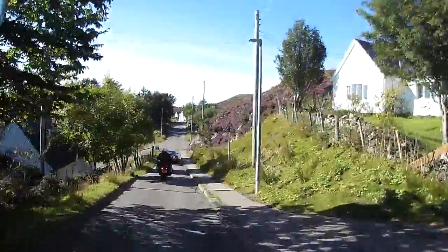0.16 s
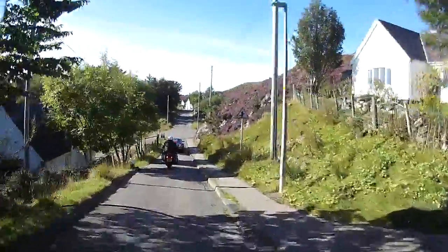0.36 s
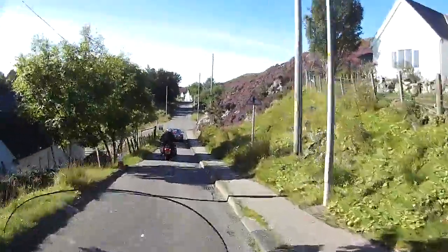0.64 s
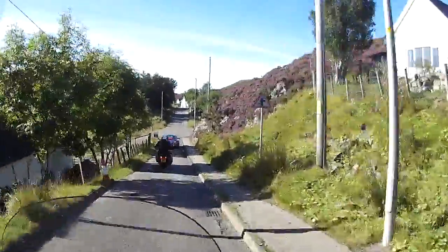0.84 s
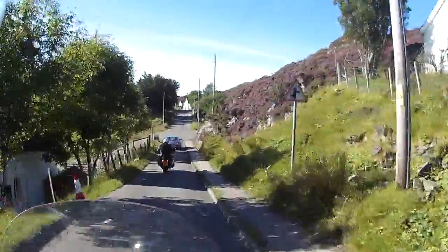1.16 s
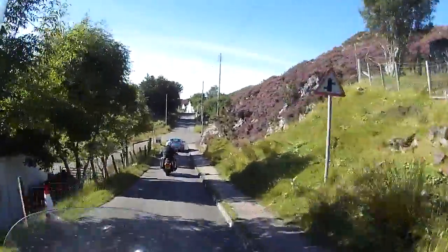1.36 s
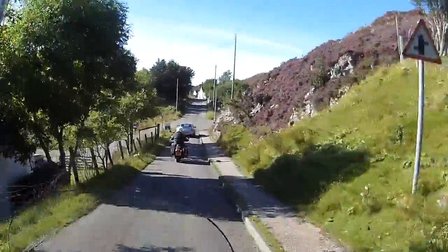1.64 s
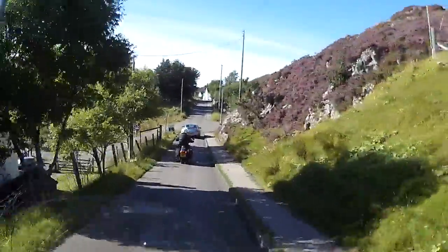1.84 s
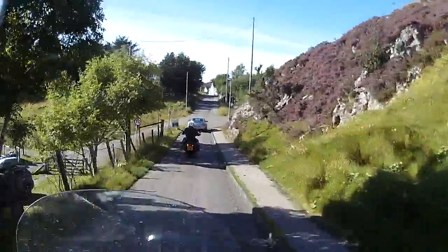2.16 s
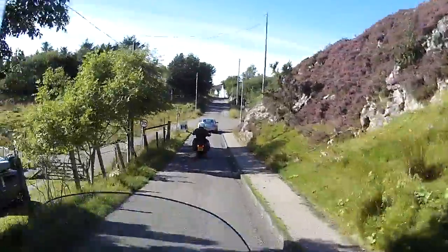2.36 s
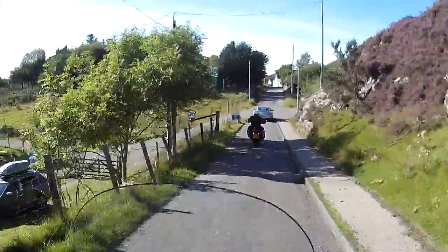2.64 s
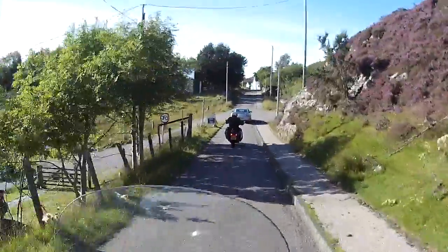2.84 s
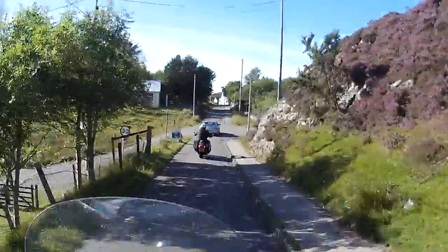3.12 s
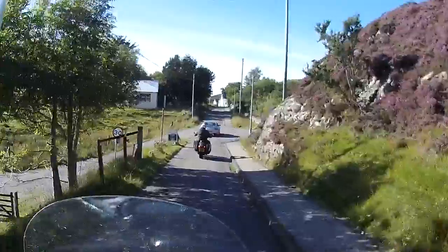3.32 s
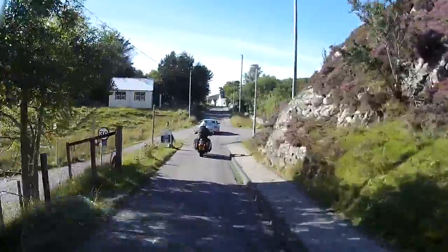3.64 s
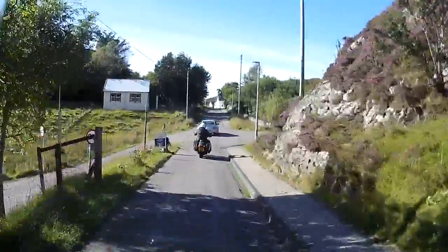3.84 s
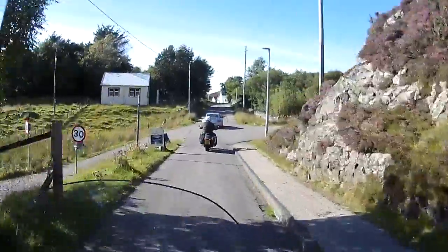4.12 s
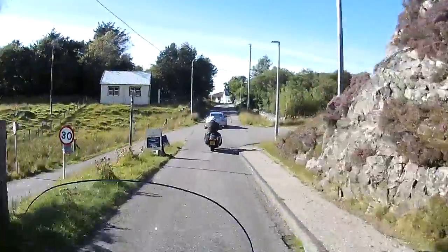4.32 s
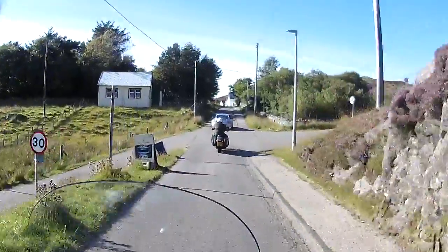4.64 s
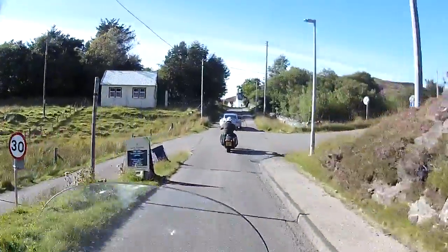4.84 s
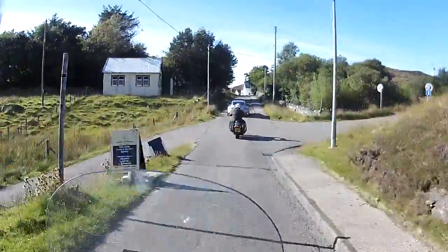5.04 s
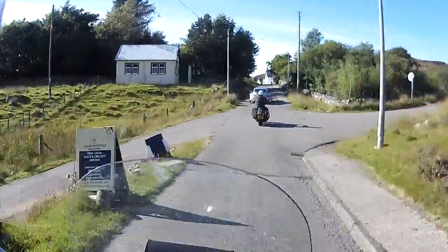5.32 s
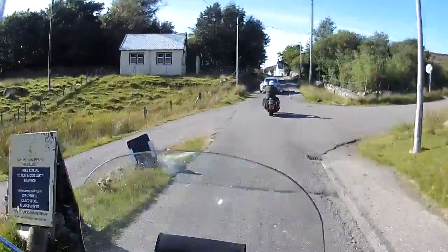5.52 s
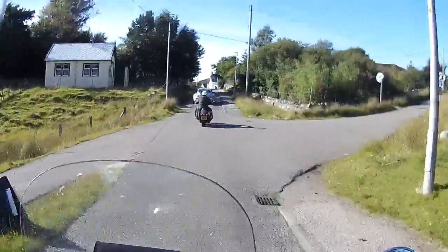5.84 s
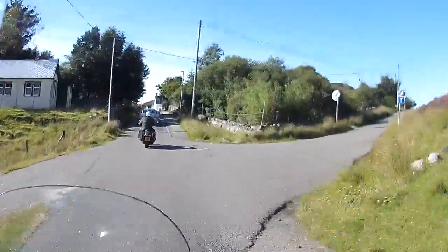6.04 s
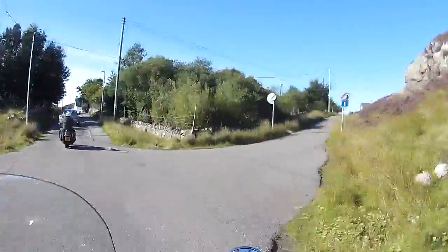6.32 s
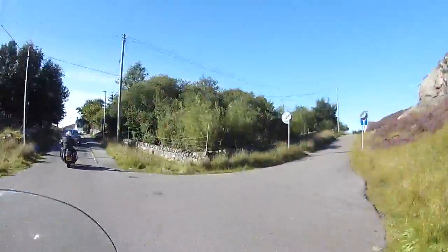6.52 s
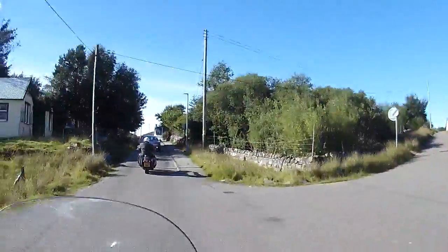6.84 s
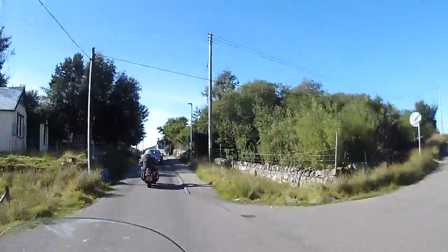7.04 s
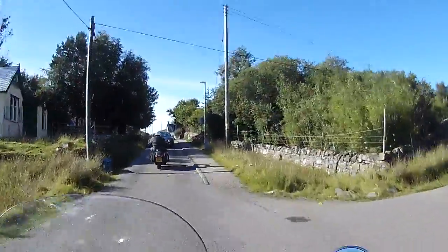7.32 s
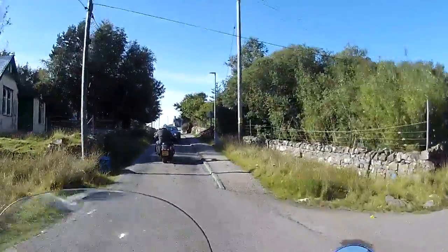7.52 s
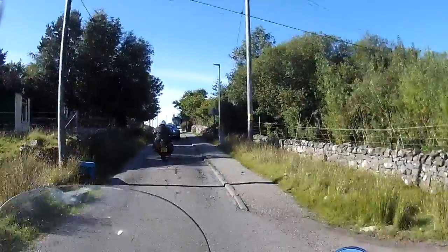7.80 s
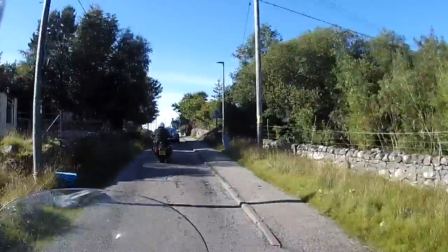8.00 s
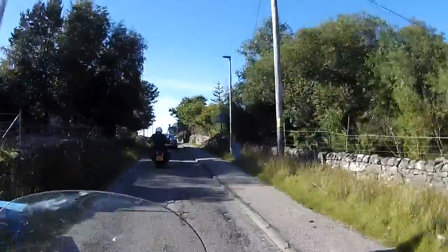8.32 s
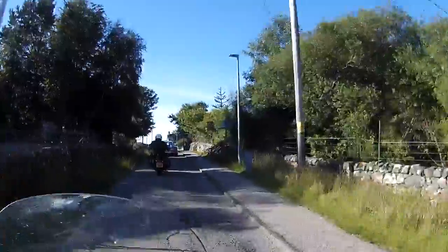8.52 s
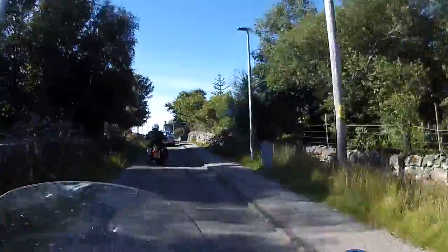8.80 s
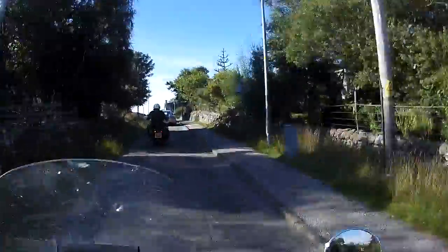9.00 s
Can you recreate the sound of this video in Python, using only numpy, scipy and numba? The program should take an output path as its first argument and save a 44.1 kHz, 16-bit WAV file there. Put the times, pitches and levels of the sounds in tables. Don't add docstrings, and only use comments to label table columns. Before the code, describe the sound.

Wind spits and crackles harshly against a microphone on a moving motorcycle, over low buffeting rumble, breathy whistle, hiss and a faint engine hum.

```python
import sys
import numpy as np
from scipy import signal
from scipy.fft import rfft, irfft
from scipy.io import wavfile
from scipy.ndimage import uniform_filter1d
from numba import njit

SR = 44100
rng = np.random.default_rng(int(sys.argv[2]) if len(sys.argv) > 2 else 0)


def field_ratio(decibels):
    return 10 ** (np.asarray(decibels, dtype=float) / 20)


def master_out(mix):
    frames = np.transpose(np.atleast_2d(mix))
    ceiling = np.clip(frames, -1, 1)
    pcm = np.round(ceiling * 32767).astype(np.int16)
    wavfile.write(sys.argv[1], SR, pcm)


N = 403956


def unit(x):
    return x / np.sqrt(np.mean(x ** 2))


def noise():
    return rng.standard_normal(N)


def curves(table):
    times, *columns = np.transpose(table)
    return [np.interp(np.arange(N) / SR, times, column) for column in columns]


def colour(x, points, size=4096):
    hz, db = np.transpose(points)
    bins = np.fft.rfftfreq(size, 1 / SR) + 1
    gain = field_ratio(np.interp(np.log(bins), np.log(hz), db))
    cepstrum = irfft(np.log(gain))
    cepstrum[1:size // 2] *= 2
    cepstrum[size // 2 + 1:] = 0
    response = irfft(np.exp(rfft(cepstrum)))
    return signal.fftconvolve(x, response / np.sqrt(np.sum(response ** 2)))[:N]


def walk(rate):
    hold = int(SR / rate)
    held = noise()[np.arange(N) // hold]
    return unit(uniform_filter1d(uniform_filter1d(held, hold), hold))


@njit
def resonator(x, hz, width):
    y, band, low = np.empty(len(x)), 0., 0.
    for i in range(len(x)):
        g, damping = np.tan(np.pi * hz[i] / SR), width / hz[i]
        v = (band + g * (x[i] - low)) / (1 + g * (g + damping))
        band, low, y[i] = 2 * v - band, low + 2 * g * v, damping * v
    return y


def narrow_band(hz, width):
    return unit(resonator(resonator(noise(), hz, width), hz, 2 * width))


# (frequency [Hz], density [dB])
HISS_SPECTRUM = [(500, -20), (1200, -13), (2050, -17), (2700, -10), (4000, -5), (4500, -9), (4900, -6),
                 (5300, -17), (8500, -21), (11500, -29), (15500, -26)]


def rush():
    level_db = -36 + 1.2 * walk(3) + 1.2 * walk(60)
    return colour(noise() * field_ratio(level_db), HISS_SPECTRUM)


# (time [s], crank rate [Hz], firing tone level [dB])
ENGINE_COURSE = [(0, 41, -42), (.8, 41, -37), (1.5, 41, -43), (5.5, 40, -43), (5.9, 41.8, -35),
                 (6.15, 40.2, -38), (6.5, 41.4, -31), (7, 42.4, -31.5), (7.5, 43.5, -31), (8, 44.2, -31),
                 (8.6, 44.7, -31), (8.8, 44.7, -37), (9.16, 44.5, -38)]
# (multiple of crank rate [1], level [dB])
FIRING_HARMONICS = [(1, -14), (2, 0), (3, -7.5), (4, -5), (5, -10)]


def engine():
    hz, db = curves(ENGINE_COURSE)
    crank_angle = 2 * np.pi * np.cumsum(hz * (1 + 0.002 * walk(11))) / SR
    tones = np.zeros(N)
    for k, level in FIRING_HARMONICS:
        tones += field_ratio(level + .8 * walk(8)) * np.sin(k * crank_angle + k * k)
    return np.sqrt(2) * field_ratio(db) * tones


# (time [s], pitch [Hz], level [dB])
EDGE_TONE = [(0, 1490, -40.5), (.11, 1480, -37), (.17, 1495, -26.5), (.34, 1490, -28.5), (.44, 1605, -25.5),
             (.8, 1545, -28.5), (1.08, 1635, -26.5), (1.42, 1570, -27.5), (1.62, 1645, -26.5),
             (1.95, 1565, -26.5), (2.3, 1590, -29.5), (2.42, 1625, -36.5), (4.3, 1505, -35),
             (5.05, 1505, -34), (6, 1580, -36), (7.6, 1625, -33.5), (8.7, 1605, -34.5), (9.16, 1605, -30.5)]


def whistle():
    hz, db = curves(EDGE_TONE)
    hz = hz * (1 + .008 * walk(25))
    pure = narrow_band(hz, 50.)
    breathy = narrow_band(hz, 190.)
    tone = pure * field_ratio(1.2 * (db + 25.5)) + .9 * breathy
    return tone * field_ratio(db + 0.8 + 1.5 * walk(25))


# (frequency [Hz], density [dB])
BUFFET_SPECTRUM = [(12, -21), (22, -4), (45, -5.5), (90, -4.5), (140, -8.5), (300, -12.5), (374, -15),
                   (520, -16), (706, -21.5), (1200, -21), (1700, -36.5)]


def buffet(rumble_db):
    rumble = colour(noise() * field_ratio(1.2 * walk(25) + 1.6 * walk(7)), BUFFET_SPECTRUM)
    return rumble * field_ratio(rumble_db + 1.5)


def cavity_hum(rumble_db):
    hz = 224 * (1 + .02 * walk(4))
    return narrow_band(hz, 48.) * field_ratio(rumble_db - 0.5 + 2.0 * walk(12))


def envelope(eddies, edge_ms=.9, tail_ms=.9, sag_db=1.2):
    power = np.zeros(N)
    for start, db, length in eddies:
        ms = np.arange(int((length + 6 * tail_ms) * SR / 1000)) * 1000 / SR
        rise = np.clip(ms / edge_ms, 0, 1)
        body = field_ratio(db - sag_db * (np.minimum(ms / length, 1) + 1.0))
        tail = np.exp(-np.maximum(ms - length + edge_ms, 0) / tail_ms)
        first = int(start * SR)
        power[first:first + len(ms)] += (rise * body * tail)[:N - first] ** 2
    return np.sqrt(power)


# (time [s], level [dB], length [ms])
STRONG_PUFFS = [(0.416, -3, 8.5), (0.461, -3, 13), (0.796, -6.5, 13), (0.98, -3, 10.4), (1.03, 0.5, 5.3),
                (1.127, 0, 6.3), (1.323, -2, 8.4), (1.514, -6, 17.5), (2.095, -1, 5.1), (2.471, -6, 11),
                (2.674, 0, 6.2), (2.763, 3.5, 8), (2.806, 1, 31), (2.916, 2.5, 15), (2.971, 4, 6.5),
                (3.069, -1, 8.8), (3.575, -10.5, 16), (3.776, -1, 8.6), (4.28, -0.5, 10.6),
                (4.734, -2.5, 12), (4.985, -2, 15), (6.381, -9, 8.4), (6.581, -6, 6), (7.424, -6, 26),
                (7.53, -5.5, 4.2), (7.584, -11.5, 27), (7.643, 2.5, 5), (7.676, -2.5, 8.2),
                (8.007, -8.5, 14), (8.973, -9.5, 10.6)]
# (time [s], level [dB])
BRIEF_SPITS = [(0.123, -13), (0.154, -8.5), (0.228, 0), (0.52, -6), (0.766, 5), (1.057, 0), (1.208, 5.5),
               (1.296, 6), (1.951, 0), (2.172, -6), (2.517, 0), (4.079, -3), (4.482, 0), (4.546, -4.5),
               (4.63, -5), (4.677, -0.5), (4.768, -2.5), (4.822, -4), (4.855, -7), (6.05, 2.5), (6.117, -1),
               (6.817, -5.5), (7.015, -10), (8.111, -3.5), (8.783, -1.5), (8.927, -1), (9.025, -4.5),
               (9.055, -12.5), (9.112, -4), (9.142, -2)]
HUSH_MS = 14


def strong_eddies():
    spit_ms = 3.44
    return STRONG_PUFFS + [(s, db, spit_ms) for s, db in BRIEF_SPITS]


def flutter_db(since_s, period_ms):
    return -14 * (since_s * 1000 / period_ms % 1)


# (start [s], length [s], strength [dB], flutter period [ms])
EDDY_FLURRIES = [(0, 0.08, -13, 29), (.288, 0.23, -9, 52), (0.586, 0.084, -9, 300), (0.682, .17, -11, 39.5),
                 (0.919, 0.16, -14, 30), (1.075, 0.46, -10.5, 45.4), (1.59, 0.151, -9.5, 560),
                 (1.887, 0.11, -12, 44), (2.021, 0.2, -13, 38), (2.37, 0.13, -12, 90),
                 (2.533, 0.12, -11, 40), (2.716, 0.31, -7.5, 41), (3.207, .4, -11, 44.6),
                 (3.655, .095, -15.5, 160), (3.789, .12, -11, 45), (4.141, 0.088, -10.5, 23.6),
                 (4.342, 0.12, -15.5, 36), (4.996, 0.086, -11, 39), (5.136, .14, -11.5, 43),
                 (5.475, 0.033, -11.5, 17.6), (5.529, .455, -6, 1500), (6.117, 0.24, -22.5, 42),
                 (6.884, .1, -10, 35.4), (7.113, 0.13, -17, 63), (7.818, 0.054, -16.5, 35),
                 (7.887, 0.093, -12.5, 53), (8.213, 0.2, -16, 36.5), (8.412, 0.079, -12, 230),
                 (8.518, 0.14, -16.5, 26.6), (8.793, 0.24, -20.5, 26)]


def shed():
    rows, strong_s = [], np.array([row[0] for row in strong_eddies()])
    for start, length, db, period in EDDY_FLURRIES:
        gap, size, last = rng.standard_normal((60, 3)).T
        gap_s = 11 / 1000 * field_ratio(4 * gap)
        since = np.cumsum(gap_s) - gap_s[0]
        ms = 4.8 * field_ratio(3.5 * last + .9 * (db + 15))
        ahead = strong_s - (start + since)[:, None]
        ahead_ms = np.where(ahead > 0, ahead, 9).min(axis=1) * 1000
        ms = np.minimum.reduce([ms, (length - since) * 1000, ahead_ms - HUSH_MS])
        level = db + 5 + 3 * size + flutter_db(since, period)
        rows += [row for row in zip(start + since, level, ms) if row[2] > 1]
    return rows


def crackle(flow_db):
    t = np.arange(N) / SR
    calm_top_db, stir_db, hush_db = -31, -14, -8
    power = field_ratio(2 * np.minimum(flow_db, calm_top_db))
    for s, length, db, period in EDDY_FLURRIES:
        stirred = envelope([(s, db + stir_db, 1000 * length)], edge_ms=2.6, tail_ms=3.8)
        power = power + (stirred * field_ratio(flutter_db(t - s, period))) ** 2
    stills = [(max(row[0] - HUSH_MS / 1000, 0), 0, HUSH_MS) for row in strong_eddies()]
    hush = envelope(stills, edge_ms=4.)
    return 10 * np.log10(power) + hush_db * np.minimum(hush, 1)


# (frequency [Hz], gain [dB])
PORT_SPECTRUM = [(150, -77), (300, -25), (1040, -13.5), (2000, -6), (3000, -2), (3950, 3.5), (4800, -4.5),
                 (6500, -17.5), (9000, -26.5), (15500, -71)]
# (frequency [Hz], density [dB])
SPRAY_SPECTRUM = [(4000, -22), (6000, 3.5), (8000, 2), (12000, -27), (15500, 9.5)]
# (time [s], level [dB], length [ms])
TREBLE_EDDIES = [
    (3.558, 3, 19.4),
    (3.68, -22, 1.2),
    (8.927, -34, 4),
]


def port(crackle_db):
    strong = envelope(shed() + strong_eddies())
    swarm_db = 6.5 * walk(800) + 4.5 * walk(90)
    pressure = np.hypot(strong, field_ratio(crackle_db + 1.5 + swarm_db))
    spike_db = 3.2 * walk(1000) + 3.5 * rng.exponential(size=N)
    spikes = unit(noise() * field_ratio(spike_db))
    gusty_db = np.minimum(8.0 * walk(49) + 4.9 * walk(700), 12)
    spray = np.hypot(np.tanh(pressure) ** 2.3 * field_ratio(gusty_db - 10.5), envelope(TREBLE_EDDIES))
    ringing = colour(spikes * pressure * field_ratio(0.05), PORT_SPECTRUM)
    return ringing + colour(noise() * spray, SPRAY_SPECTRUM)


# (time [s], buffeting round the housing [dB], flow across the port [dB])
AIRFLOW = [(0, -27.5, -23), (.2, -32, -37.5), (.5, -28, -37), (.89, -29, -34), (1.1, -28.5, -33),
           (1.7, -26, -11), (1.84, -31, -38.5), (2.3, -32.5, -45.5), (2.88, -26.5, -4), (3.13, -30.5, -31),
           (3.6, -29.5, -27.5), (4.7, -32.5, -31), (5.38, -31, -34), (5.75, -30, -10.5), (6.0, -31, -24),
           (6.5, -33.5, -44), (7.02, -31.5, -31), (9.16, -30.5, -35.5)]


def scene():
    buffet_db, flow_db = curves(AIRFLOW)
    background = rush() + engine() + whistle()
    wind = buffet(buffet_db) + cavity_hum(buffet_db) + port(crackle(flow_db))
    return (background + wind)[None]


def top_cut(x):
    return signal.sosfilt(signal.butter(12, 16640, fs=SR, output="sos"), x)


def record(dry):
    ceiling, knee, offset = .7, 8.0, -.022
    clipped = dry / (1 + np.abs(dry / ceiling) ** knee) ** (1 / knee)
    low_pass = signal.firwin(255, 15350, fs=SR)
    mix = signal.fftconvolve(clipped, low_pass[None], "same") + offset
    return top_cut(mix)


dry = scene()
out = record(dry)
master_out(out)
```